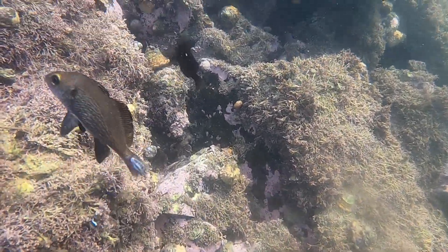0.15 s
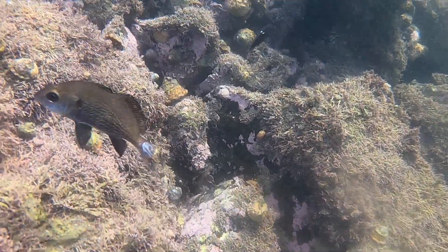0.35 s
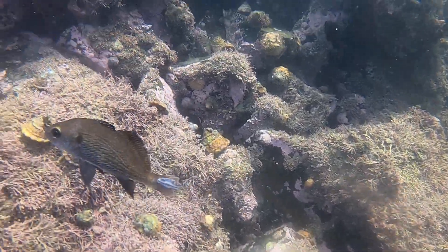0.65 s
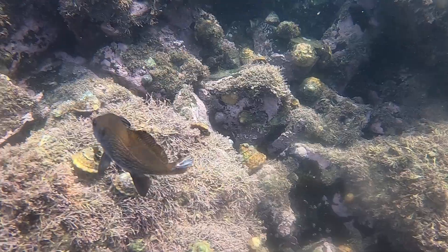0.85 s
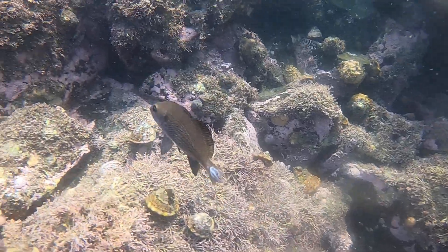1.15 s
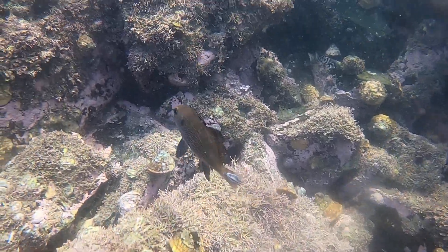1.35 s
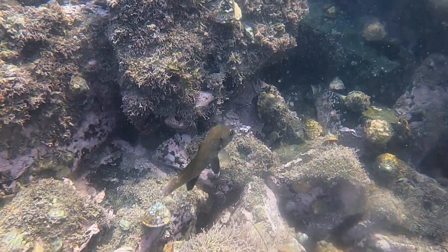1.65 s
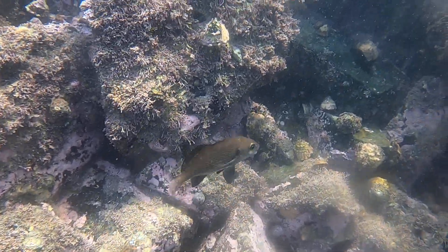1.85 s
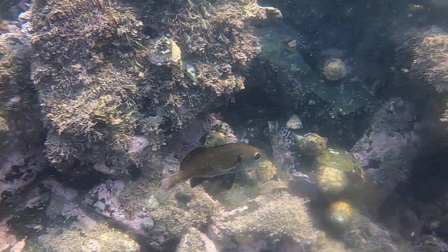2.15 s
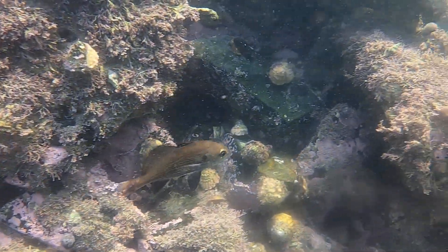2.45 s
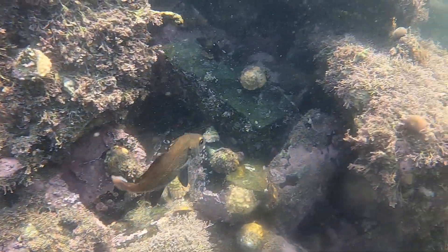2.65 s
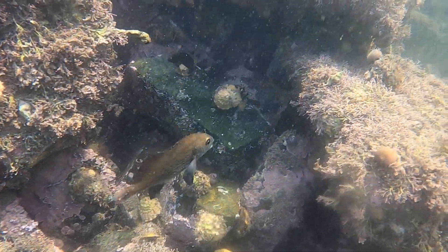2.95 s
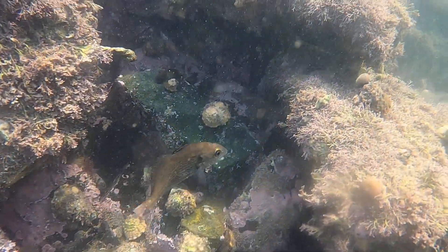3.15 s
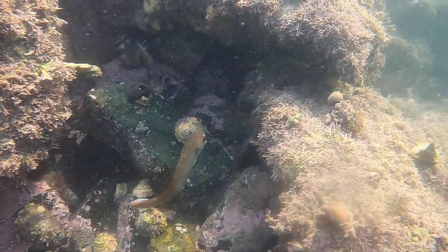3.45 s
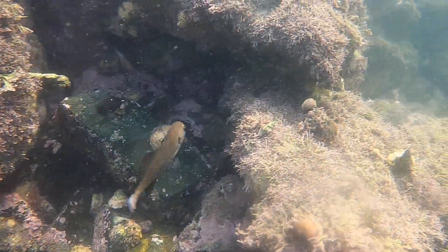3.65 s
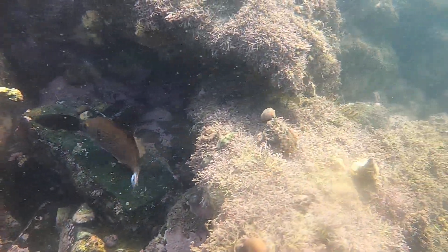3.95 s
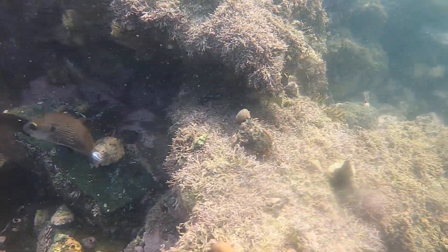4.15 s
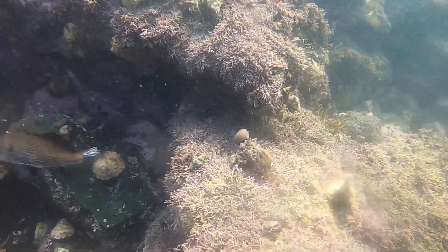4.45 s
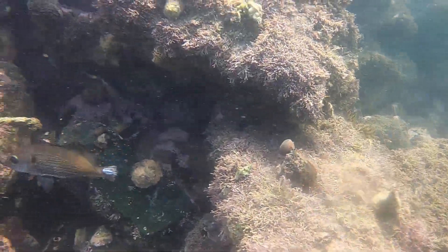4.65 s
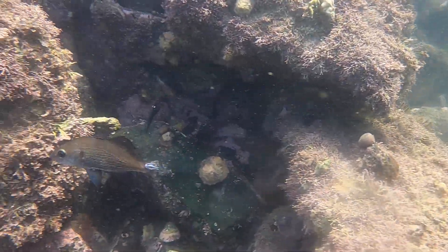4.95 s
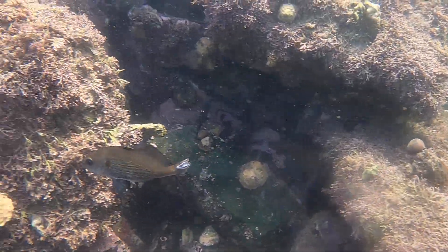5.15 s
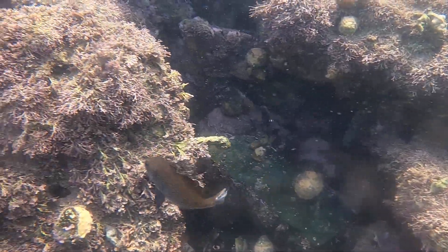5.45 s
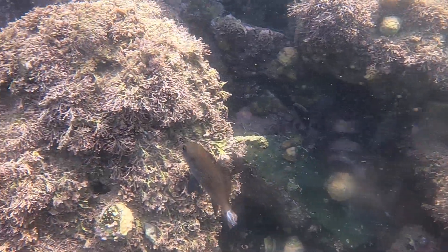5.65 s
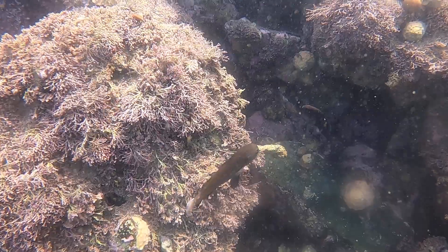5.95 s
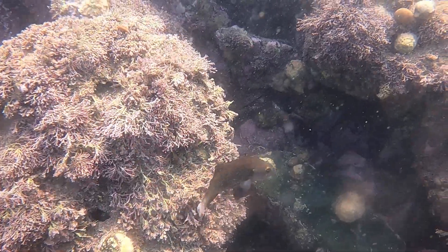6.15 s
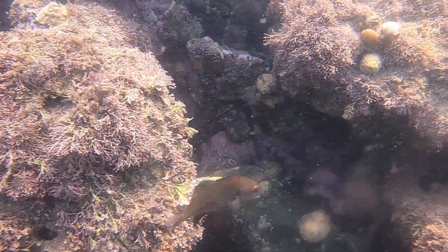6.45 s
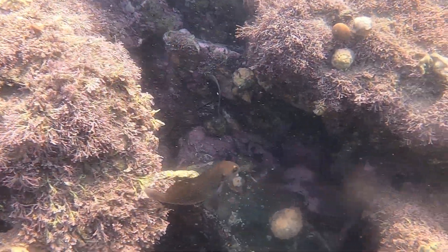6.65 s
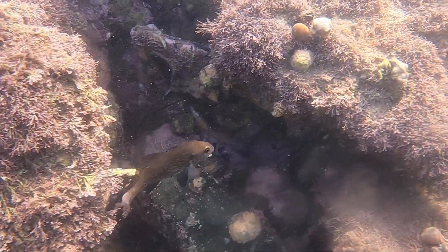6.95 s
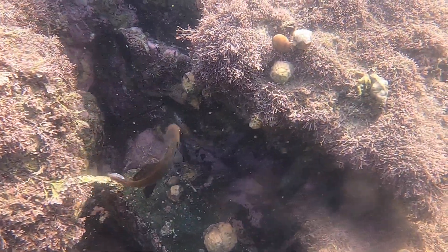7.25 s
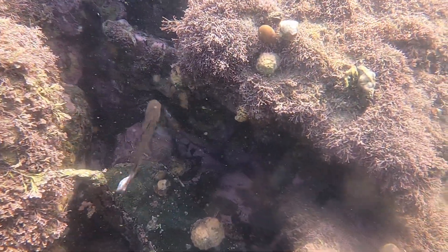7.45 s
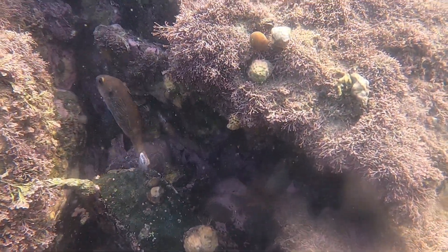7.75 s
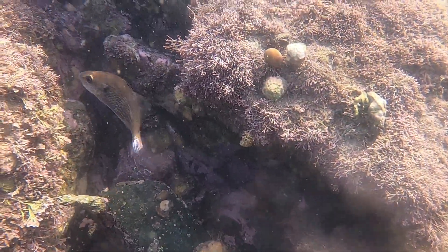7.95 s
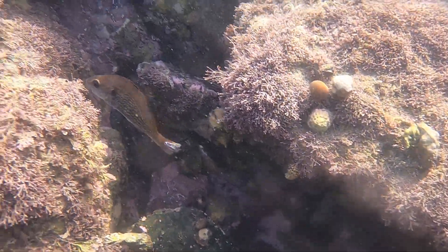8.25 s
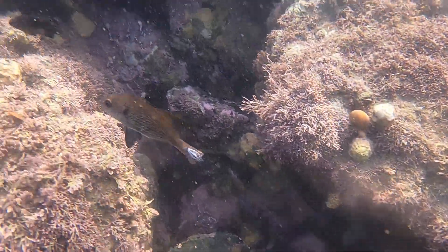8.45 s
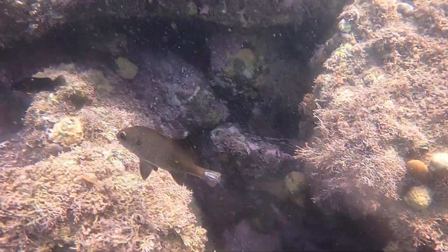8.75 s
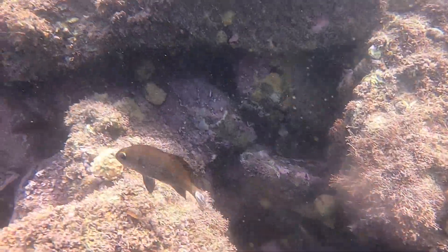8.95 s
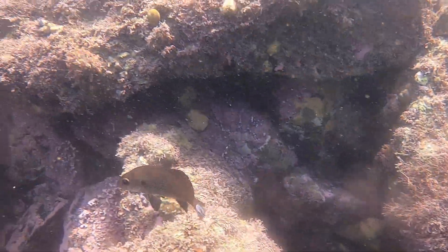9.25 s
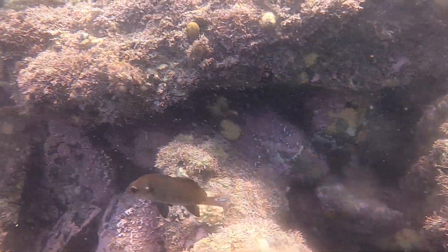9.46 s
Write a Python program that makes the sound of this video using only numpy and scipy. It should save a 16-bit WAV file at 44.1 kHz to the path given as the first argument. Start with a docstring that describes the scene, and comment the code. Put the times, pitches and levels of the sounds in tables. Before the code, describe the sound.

Snapping shrimp pop and tick constantly, hollow and muffled, above a deep soft water surge, with a few low knocks on the housing.

```python
"""Inside a sealed housing over a shallow rocky reef, 9.6 s, with snapping shrimp all around from the start.
Dull pops set the housing's air ringing, sharp ticks ring its shell modes, and some snaps ping at their own pitch.
Far snaps, random clicks through the same resonances, swell and ebb over a rumbling surge of shaped noise.
A wavering bass hum, a sine, comes up over the first two seconds and then swells and sinks.
Soft low rings knock the housing near 1.2, 3.7 and 6.8 s, and twice near 7.7 s as the rumble swells."""
import sys
import numpy as np
from scipy import signal
from scipy.fft import rfft, irfft
from scipy.io import wavfile

SR = 44100
rng = np.random.default_rng(int(sys.argv[2]) if len(sys.argv) > 2 else 0)


def materialize(psi):
    """Save the field psi as 16-bit PCM at rate SR to the path in sys.argv[1].

    A 1-D psi becomes a single channel; in a 2-D psi each row is a channel.
    """
    bounded = np.clip(np.atleast_2d(psi).T, -1, 1)
    quanta = np.round(bounded * 32767).astype(np.int16)
    wavfile.write(sys.argv[1], SR, quanta)


N = 423360

# the loudest dull pops, before they lean left:
# (time of the crest [s], peak of the swell [dB], pitch [Hz], hardness: overtones against the peak [dB])
NEAR_POPS = [(0.138, -27, 400, -28.5), (0.302, -15, 392, -31), (0.321, -24.5, 450, -25.5),
             (0.39, -25, 402, -25.5), (0.563, -27.5, 500, -24), (0.66, -24, 457, -26),
             (0.826, -28, 436, -28), (0.9, -13.0, 435, -27.5), (0.9869, -10.5, 462, -9),
             (1.094, -31, 406, -20), (1.1814, -7.5, 459, -11), (1.293, -33, 382, -30),
             (1.802, -16.5, 411, -23), (1.891, -29, 420, -30), (1.925, -23.5, 477, -16.5),
             (2.083, -16, 395, -27), (2.152, -25, 433, -33), (2.188, -11.5, 440, -30.5),
             (2.305, -24, 470, -30), (2.412, -30, 394, -34), (2.484, -15, 430, -33.5),
             (2.527, -17.0, 407, -25), (2.559, -19, 442, -17), (2.663, -28.5, 452, -29.5),
             (2.76, -9.5, 407, -39.5), (2.834, -17, 493, -21), (2.955, -18, 480, -27.5),
             (3.069, -16.5, 385, -36.5), (3.087, -12.0, 420, -31), (3.243, -18.5, 450, -43),
             (3.261, -23.5, 455, -22.5), (3.292, -27.5, 423, -20), (3.372, -26, 417, -12.5),
             (3.408, -12, 401, -26), (3.562, -15.5, 406, -37), (3.681, -16, 397, -26.5),
             (3.696, -20, 416, -26), (3.757, -21, 447, -18), (3.816, -25.5, 420, -24),
             (3.886, -28.5, 395, -28), (3.941, -27.5, 463, -19.5), (3.986, -24.5, 433, -29.5),
             (4.08, -30.5, 440, -26), (4.247, -23.5, 436, -20.5), (4.475, -20.5, 413, -27),
             (4.5, -16.0, 442, -33.5), (4.568, -22.5, 388, -28.5), (4.591, -23.5, 398, -33),
             (4.738, -26.5, 420, -18), (4.772, -29, 393, -28), (4.847, -26.5, 410, -27.5),
             (4.892, -20.5, 440, -19.5), (4.908, -17, 415, -22.5), (4.948, -26, 453, -23),
             (5.065, -27, 406, -28), (5.108, -17.0, 427, -39), (5.206, -23.5, 418, -28.5),
             (5.262, -28, 440, -46), (5.392, -24, 426, -17), (5.415, -13.5, 423, -31.5),
             (5.462, -25.5, 392, -20.5), (5.469, -16, 434, -22.5), (5.505, -18.5, 410, -28),
             (5.514, -18.5, 460, -27), (5.644, -25.5, 433, -14.5), (5.658, -20.5, 448, -22),
             (5.854, -12.5, 413, -29.5), (5.929, -33, 453, -17), (5.963, -12, 413, -39),
             (6.062, -28, 420, -25.5), (6.122, -29.5, 417, -26.5), (6.313, -28, 417, -27.5),
             (6.455, -15.5, 395, -26.5), (6.576, -26, 453, -31), (6.596, -20, 445, -18),
             (6.634, -24.5, 424, -25), (6.698, -28.5, 380, -32), (6.8, -10.5, 411, -24),
             (6.812, -28, 404, -32), (6.952, -27, 398, -25), (6.994, -27.5, 430, -22.5),
             (7.002, -23, 411, -34.5), (7.014, -16.5, 434, -29.5), (7.202, -24.5, 398, -23),
             (7.293, -30.5, 384, -20), (7.555, -34, 427, -26.5), (7.711, -24, 396, -37),
             (7.7254, -12, 383, -23.5), (7.7307, -7, 380, -32.5), (7.753, -22, 370, -50),
             (7.807, -13, 420, -37), (7.91, -26.5, 443, -17.5), (7.972, -20.5, 460, -20),
             (8.033, -27.5, 410, -15.5), (8.127, -18, 427, -31), (8.188, -15, 437, -31.5),
             (8.377, -21.5, 434, -28.5), (8.402, -27.5, 387, -26), (8.446, -25, 476, -30.5),
             (8.774, -19.5, 429, -29), (8.879, -24.5, 472, -49.5), (8.973, -21, 414, -24),
             (9.114, -23, 444, -29), (9.159, -18.5, 440, -33.5), (9.329, -12, 430, -22.5),
             (9.392, -15, 434, -30.5), (9.418, -19, 414, -22.5), (9.487, -21, 438, -27),
             (9.521, -28, 447, -27.5)]


def from_db(db):
    """Gain of a level in dB."""
    return 10 ** (np.asarray(db) / 20)


def rms_one(x):
    """Scaled to rms 1."""
    return x / np.sqrt(np.mean(x ** 2) + 1e-20)


def in_time(rows):
    """Columns of a curve, drawn in straight lines to every sample."""
    s, *columns = np.transpose(rows)
    return [np.interp(np.arange(N) / SR, s, column) for column in columns]


def band(x, kind, edges_hz, order=2):
    """Butterworth filter that keeps one range of pitch."""
    return signal.sosfilt(signal.butter(order, edges_hz, kind, fs=SR, output="sos"), x)


def ring(x, hz, width_hz):
    """Resonance: a unit click sets a sine of height 1 ringing, and a wider resonance dies sooner."""
    radius = np.exp(-np.pi * width_hz / SR)
    turn = 2 * np.pi * hz / SR
    return signal.lfilter([0, np.sin(turn)], [1, -2 * radius * np.cos(turn), radius * radius], x + 1e-18)


def fading(x, tau_s):
    """Every click leaves an exponential trail."""
    return signal.lfilter([1], [1, -np.exp(-1 / (tau_s * SR))], x + 1e-18)


def fading_twice(x, tau_s):
    """Every click swells up, then dies away."""
    return fading(fading(x, tau_s), tau_s)


def scatter(per_s, spread_db):
    """Random clicks, many small and few large."""
    sizes = from_db(spread_db * np.minimum(rng.exponential(1, N), 2.3))
    return sizes * (rng.random(N) < per_s / SR)


def soft_rings(rows, cycles, roundness):
    """A soft push into trapped air swells for some cycles and dies as smoothly."""
    out = np.zeros(N + 4096)
    t = np.arange(4096) / SR
    for (s, peak_db, hz, *_), (turn, length) in zip(rows, rng.random((len(rows), 2))):
        rise_s = cycles * (0.802 + 0.26 * length) / hz
        age = t / rise_s
        shape = (age * np.exp(1 - age)) ** roundness     # reaches 1 at the crest
        at = max(round((s - rise_s) * SR), 0)
        out[at:at + len(t)] += from_db(peak_db) * shape * np.sin(2 * np.pi * (hz * t + turn))
    return out[:N]


def struck(modes, blows, far, murmur, crowd, tail):
    """Each snap strikes every mode with its own strength; echoes off the rocks keep it fed for a moment."""
    pivot_hz, tilt_top_octaves = 2470, 0.8   # brightness turns about this pitch, gains no more above this height
    out = np.zeros((2, N))
    at = np.round(blows[:, 0] * SR).astype(int)
    white = rng.standard_normal((2, N))
    for k, (hz, width_hz, left_db, right_db) in enumerate(modes):
        snaps = far * from_db(np.minimum(rng.normal(0, 5.7, N), 9.0))
        tilt_db = blows[:, 2] * min(np.log2(hz / pivot_hz), tilt_top_octaves)
        snaps[at] = from_db(blows[:, 1] + tilt_db + rng.normal(0, 2.53, len(at)))

        quick = (2000 / hz) ** 0.46     # the treble of the echoes dies sooner
        # arrivals crowd in, then thin out
        swell = fading_twice(snaps, tau_s=0.0013 * quick) / (60 * quick)
        trail = crowd * swell + tail * fading(snaps, tau_s=0.012 * quick) + murmur

        # the water softens the first arrival: the mode builds up over a moment
        onset_hz = 2.1 * width_hz + 300
        onset = 1.235 * 2 * np.pi * onset_hz / SR * ring(snaps, hz, onset_hz)
        shared = onset + trail * np.roll(white[0], 999 * k)

        alike = np.clip(1.5 - hz / 5000, .5, .97)     # the two ports part in the treble
        apart = np.sqrt(1 - alike ** 2) * 4.43 * trail * np.roll(white[1], 999 * k)
        out[0] += from_db(left_db) * ring(shared, hz, width_hz)
        out[1] += from_db(right_db) * ring(alike * shared + apart, hz, width_hz)
    return out


def pop_edges():
    """Time [s], strength [dB] and brightness [dB per octave] of the hard edge that leads each near pop."""
    s, peak_db, _, hardness_db = np.transpose(NEAR_POPS)
    usual_hardness_db = -21.5
    brightness = 0.1275 * (hardness_db - usual_hardness_db)   # a harder pop has a brighter edge
    edge_s = s + 0.00011 * hardness_db     # the softer the pop, the further its edge leads the crest
    return np.c_[edge_s, peak_db + hardness_db, brightness]


def pops(far_db):
    """Near pops and their overtones, over the murmur of far ones in the same air space."""
    # overtones of the air space: (pitch [Hz], width [Hz], left gain [dB], right gain [dB])
    overtones = [(578, 60, 10.5, 2), (678.4, 82, 5, -4.5), (924, 74, -2, -17.5), (1130, 180, 2, -14),
                 (1493, 70, 1, -16.5)]
    near = soft_rings(NEAR_POPS, cycles=1.746, roundness=2.43)

    snaps = scatter(per_s=90, spread_db=6.0)
    far = snaps * rng.choice([-1, 1], N) + 0.056 * rng.standard_normal(N)
    air = ring(ring(far, hz=380, width_hz=180), hz=461.0, width_hz=96)
    air = band(air, "high", 290)   # the small air space holds no bass
    body = near + from_db(far_db) * rms_one(air)

    far_edges = from_db(far_db - 30.0) * snaps
    over = struck(overtones, pop_edges(), far_edges, from_db(far_db - 55.0), crowd=0.06, tail=0.0058)
    return body * from_db([[1.3], [-1.5]]) + band(over, "band", [500, 1700])


def shell_blows(group):
    """Time, strength and brightness with which near pops and ticks strike one group of shell modes."""
    # the loudest sharp ticks: (time [s], strength about the middle modes [dB], brightness [dB per octave])
    near_ticks = [(0.055, -51, 5), (0.278, -51, -7), (0.315, -49.5, -4), (0.549, -52, -3), (0.584, -53, -9),
                  (0.635, -48.5, -13), (0.655, -47, -7), (0.686, -61, -1), (0.697, -51, -8),
                  (0.818, -54, -6), (0.864, -49, -25), (0.897, -58, -18), (0.974, -52.5, -14),
                  (0.9845, -38.5, 8.5), (1.093, -55, -9), (1.136, -42, -5), (1.183, -45.5, 13),
                  (1.213, -57, -10), (1.268, -39, -9.5), (1.412, -47.5, -10), (1.476, -73, 8),
                  (1.539, -55, 0), (1.799, -40.5, -1), (2.029, -57.5, -2), (2.266, -60.5, 17),
                  (2.3, -53, -6), (2.322, -57, 5.5), (2.465, -49.5, -8), (2.479, -44, -5), (2.51, -54, -4),
                  (2.595, -55.5, 10.5), (2.688, -55.5, -11), (2.755, -48, -6), (2.83, -44.5, -21.5),
                  (2.983, -58, 7.5), (3.238, -52.5, 3), (3.372, -32.5, -4), (3.558, -46.5, -2.5),
                  (3.627, -59, 1), (3.669, -36, -10.5), (3.676, -46, 4), (3.698, -42, -4.5),
                  (3.761, -49.5, -3.5), (3.901, -67, 16), (3.944, -49.5, 6), (3.982, -48, -4),
                  (4.011, -50, -9), (4.139, -56, 10), (4.19, -45.5, -1), (4.246, -53, -2), (4.373, -52, -8),
                  (4.413, -55.5, -14.5), (4.47, -54, -14), (4.591, -58, 2.5), (4.666, -45.5, 0.5),
                  (4.715, -70, 18), (4.734, -53.5, -24), (4.944, -58.5, 4), (4.994, -63, 7),
                  (5.197, -45.5, -7), (5.221, -55, -7), (5.25, -56, 3), (5.272, -72, 16),
                  (5.293, -65.5, 24), (5.366, -54.5, -25), (5.389, -56, 8), (5.416, -47.5, -0.5),
                  (5.466, -54.5, 0), (5.499, -46, 3), (5.51, -46.5, 1.5), (5.606, -46.5, -8),
                  (5.64, -51, -1), (5.693, -54.5, -2), (5.721, -54, -7), (5.927, -37.5, -9.5),
                  (6.383, -58, 0), (6.418, -55, 1), (6.448, -49, -3), (6.593, -54, 3), (6.764, -49.5, -5),
                  (6.798, -47.5, -8.5), (6.957, -51.5, -15), (6.992, -52, -1), (7.046, -57.5, -13),
                  (7.197, -56, -5), (7.29, -50, -14), (7.305, -47, 1), (7.298, -50, -8), (7.324, -57, -6),
                  (7.474, -54.5, -3), (7.548, -55, -3), (7.587, -52.5, -7), (7.705, -56, -11),
                  (7.725, -45.5, 6.5), (7.906, -51, -1.5), (7.989, -56.5, -21), (8.029, -57, -5.5),
                  (8.121, -49.5, 2), (8.17, -54, -14), (8.258, -53.5, -7), (8.349, -51.5, -2),
                  (8.526, -58, -19), (9.066, -58, 6), (9.118, -50.5, -7), (9.154, -49, 1.5),
                  (9.175, -53, -2), (9.311, -44, 5.5), (9.326, -44, -13), (9.372, -57, 4.5)]
    # a pop's hard edge in each group of shell modes, against its overtones: one level [dB] a group
    pop_in_shell_db = [-7, -14, -18.5, -30]
    return np.r_[pop_edges() + [0, pop_in_shell_db[group], 0], near_ticks]


def ticks(far_db):
    """Near snaps ring the shell over far ones, many of which reach only one group of its modes."""
    # shell modes in groups, low, middle, high, top: (pitch [Hz], width [Hz], left gain [dB], right gain [dB])
    shell = [
        [(1733, 197, 6, -0.5), (2100, 680, -21.5, -10)],
        [(2300, 290, -3.5, -3.5), (2690, 334, 9, 2), (3153, 310, 8, -3.5)],
        [(4510, 1020, 10, -3), (4970, 420, -15.5, -8), (5800, 520, -7.5, -14)],
        [(6950, 1700, -11, -20), (7840, 480, -9.5, -38.5), (10100, 1300, -6.5, -20)],
    ]
    # each group of modes fades outside its range: (lower edge [Hz], upper edge [Hz])
    shell_edges_hz = [(1200, 1935), (2000, 3730), (3700, 8100), (6200, 10000)]
    out = 0
    everywhere = scatter(per_s=40, spread_db=2.0)
    for group, (modes, edges_hz) in enumerate(zip(shell, shell_edges_hz)):
        far = from_db(far_db - 12.0) * (everywhere + scatter(per_s=69, spread_db=7.5))
        patchy_db = 2.8 * rms_one(fading_twice(rng.standard_normal(N), tau_s=0.013))
        murmur = from_db(far_db - 25.5 + patchy_db)      # snaps too far and many to tell apart
        rings = struck(modes, shell_blows(group), far, murmur, crowd=0.2, tail=0.025)
        out = out + band(rings, "band", edges_hz)
    return np.array([np.roll(out[0], 4), out[1]])   # the shell reaches the right port 4 samples sooner


def pings():
    """Snaps at one clear pitch: each rises fast and rings out for some cycles, louder at the left port."""
    # before the lean to the left: (time of the crest [s], peak of the swell [dB], pitch [Hz])
    clear_snaps = [(0.976, -36.5, 760), (0.9865, -13.5, 1570), (0.987, -28, 3250), (1.17, -36, 760),
                   (1.1805, -21.5, 770), (1.19, -39, 2300), (1.218, -49, 1000), (3.04, -41, 710),
                   (3.371, -31, 4900), (3.671, -26, 1951), (3.675, -22.5, 2690), (3.763, -42, 1110),
                   (4.374, -36, 2900), (4.908, -41, 1440), (5.294, -27.5, 5500), (5.693, -43.5, 845),
                   (6.798, -36, 765), (6.799, -39, 1850), (7.086, -46, 930), (7.724, -34.5, 1015),
                   (7.728, -26.5, 1650), (7.996, -37, 1687), (8.004, -45, 1800), (8.013, -46, 1520),
                   (9.154, -39, 2870), (9.327, -30, 1200), (9.404, -44, 770)]
    rings = soft_rings(clear_snaps, cycles=1.6, roundness=0.7)
    return np.array([np.roll(rings, 4), rings]) * from_db([[3.0], [-4.0]])   # right port 4 samples sooner


def knocks():
    """Blows on the housing: low rings that swell within about a cycle and die smoothly."""
    # before the slight lean of the lows: (time of the crest [s], peak of the swell [dB], pitch [Hz])
    blows = [(1.181, -19, 299), (3.68, -30, 260), (6.799, -21, 233), (7.728, -8.5, 199), (7.752, -26, 250)]
    return soft_rings(blows, cycles=0.96, roundness=2.04)


def surge():
    """Water pushing on the housing: low shaped noise, nearly alike on both sides, that swells and ebbs."""
    # level of the rumble's middle: (time [s], level [dB])
    swells = [(0.0, -33), (3.31, -37.5), (3.42, -36.5), (4.28, -32.5), (7.11, -38.5), (7.78, -29),
              (7.99, -37), (9.3, -33), (9.6, -38)]
    # colour of the rumble before it is scaled to rms 1: (pitch [Hz], relative level [dB])
    rumble = [(8.8, -29), (15, 8.5), (38, 0.5), (73, -2), (99, -10.5), (146, -18), (204, -26.5), (330, -28),
              (430, -46), (730, -120)]
    hz = np.maximum(np.fft.rfftfreq(N, 1 / SR), 1)
    points = np.array(rumble)
    colour = from_db(np.interp(np.log(hz), np.log(points[:, 0]), points[:, 1], right=-120))
    mid, side = (rms_one(irfft(rfft(rng.standard_normal(N)) * colour, N)) for _ in range(2))
    rumble_db, = in_time(swells)
    return from_db(rumble_db) * (mid + from_db(-24.5) * side * [[1], [-1]])


def hum():
    """A thin sine of gliding pitch whose strength wavers at random."""
    # before the waver: (time [s], pitch [Hz], level [dB])
    glide = [(0, 83.45, -63), (1.1, 85, -53), (1.7, 85.7, -46), (1.95, 86, -55), (2.2, 87, -42.5),
             (3.3, 86.8, -45.5), (4.6, 88.26, -41.5), (4.95, 88.04, -64), (6.4, 85.3, -42.5),
             (7.2, 85.8, -55), (7.8, 89.6, -40.5), (8.7, 87, -52), (9.6, 85.9, -50)]
    hum_hz, hum_db = in_time(glide)
    waver = 1 + .5 * rms_one(fading_twice(rng.standard_normal(N), tau_s=0.095))
    tone = np.sqrt(2) * np.sin(2 * np.pi * np.cumsum(hum_hz) / SR)
    return from_db(hum_db) * waver * tone


def scene():
    """Pops and pings lean left; rumble, hum and knocks sit almost in the middle."""
    # the far colony swells and falls quiet: (time [s], far pops [dB], far ticks [dB])
    colony = [(0.0, -41.5, -64.5), (.7, -43, -66), (1.2, -40, -65.5), (1.63, -47, -67), (2.75, -39.5, -67),
              (3.61, -45, -67.5), (4.4, -42.5, -66), (5.1, -46, -66.5), (5.55, -41.5, -64.5),
              (6.2, -45, -67), (7.3, -43.5, -66.5), (8.2, -39.5, -65.5), (8.65, -47.5, -68),
              (9.2, -40, -66), (9.6, -48, -66)]
    far_pop_db, far_tick_db = in_time(colony)
    low = surge() + hum() + knocks()
    return pops(far_pop_db) + ticks(far_tick_db) + pings() + low * from_db([[.4], [-.4]])


def record(dry):
    """The housing muffles the top, the microphone hisses faintly, the top is cut."""
    muffled = band(dry, "low", 6500)
    # hiss shared by both sides, and a weaker part of each side's own
    hiss = from_db(-102) * (rng.standard_normal(N) + 0.7 * rng.standard_normal((2, N)))
    return band(muffled + hiss, "low", 13000, order=6)


dry = scene()
out = record(dry)
materialize(out)
```